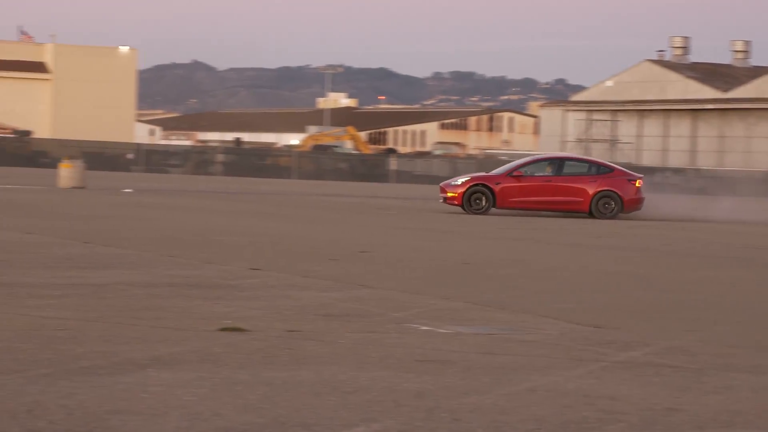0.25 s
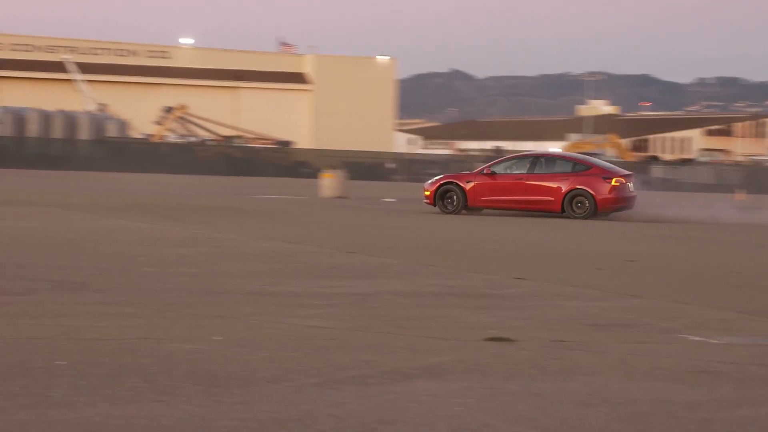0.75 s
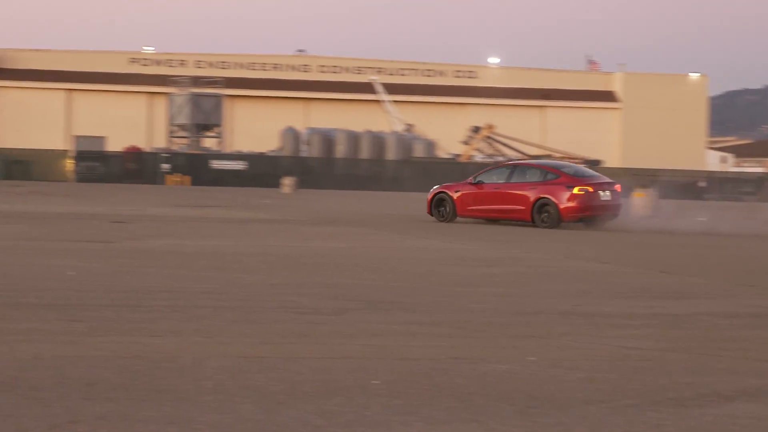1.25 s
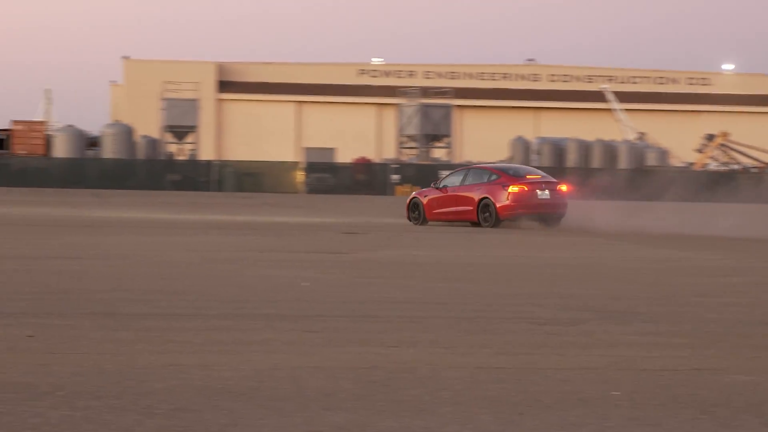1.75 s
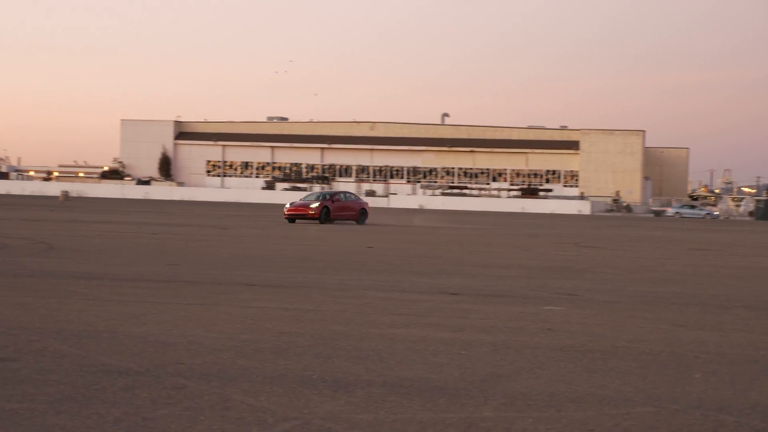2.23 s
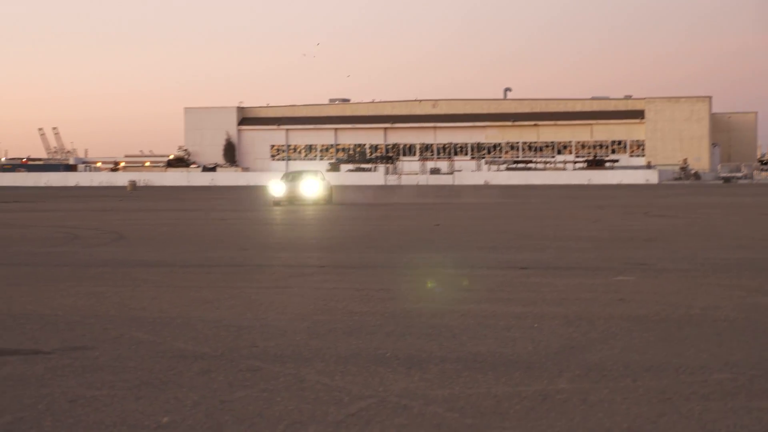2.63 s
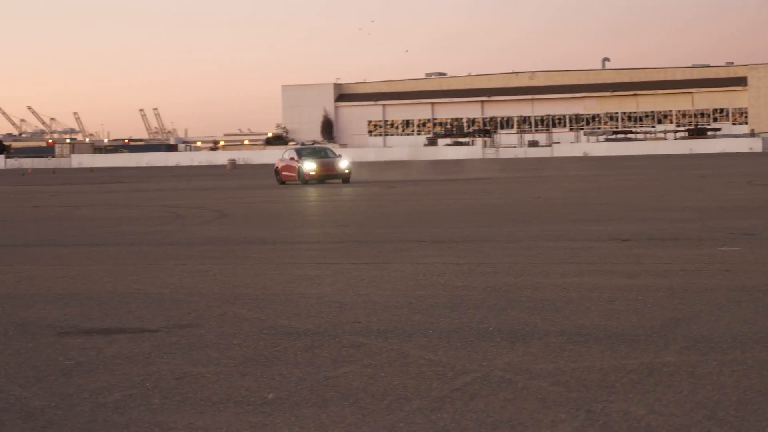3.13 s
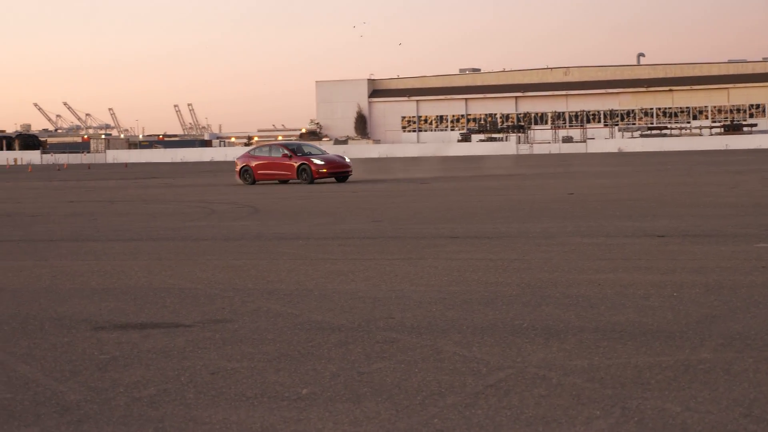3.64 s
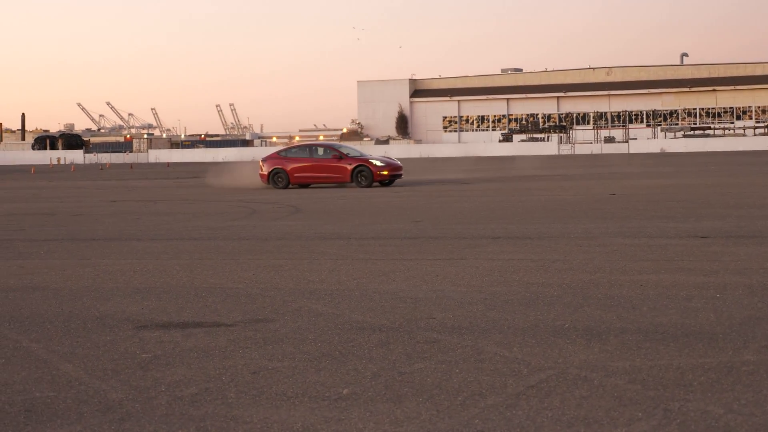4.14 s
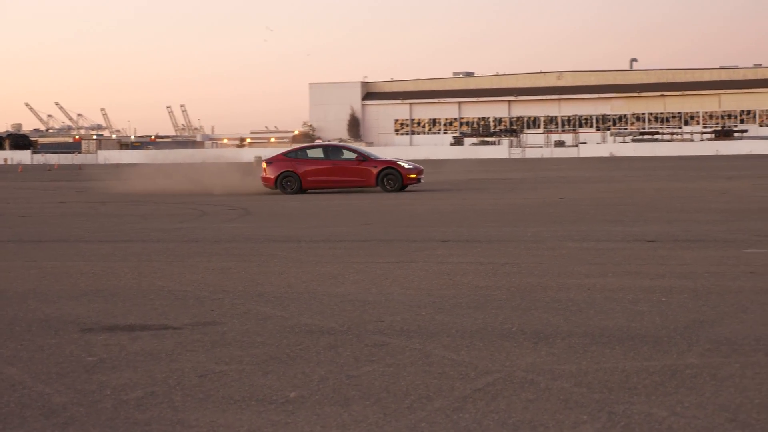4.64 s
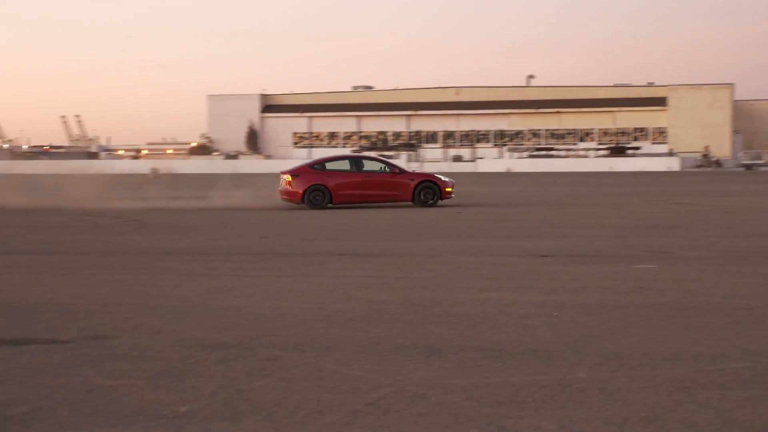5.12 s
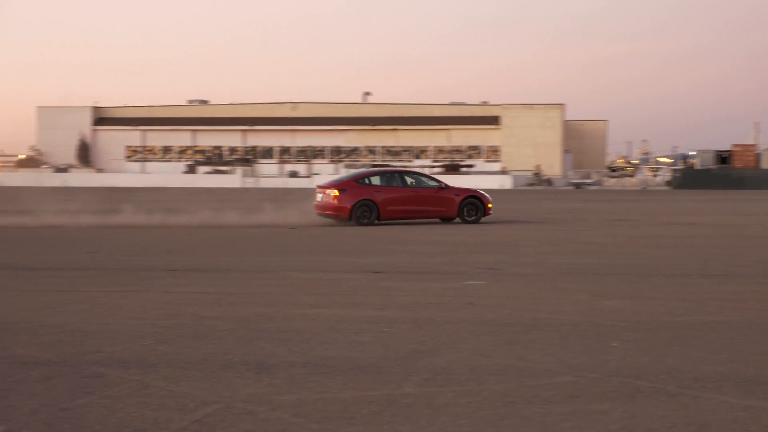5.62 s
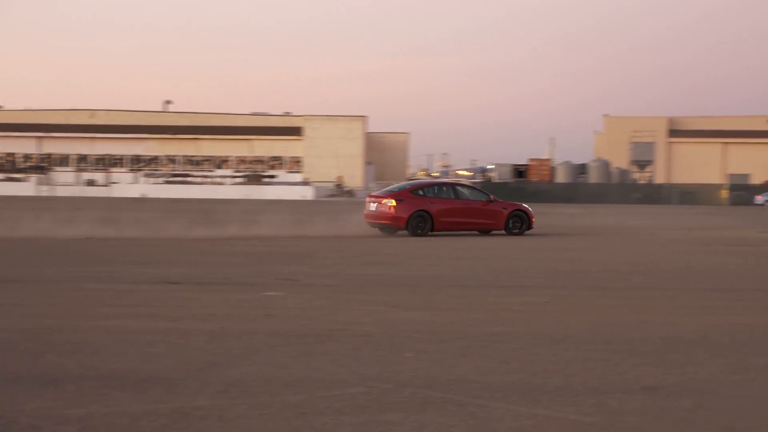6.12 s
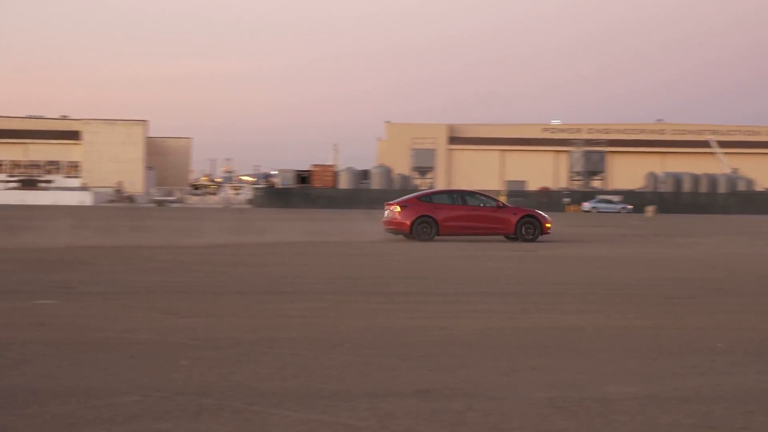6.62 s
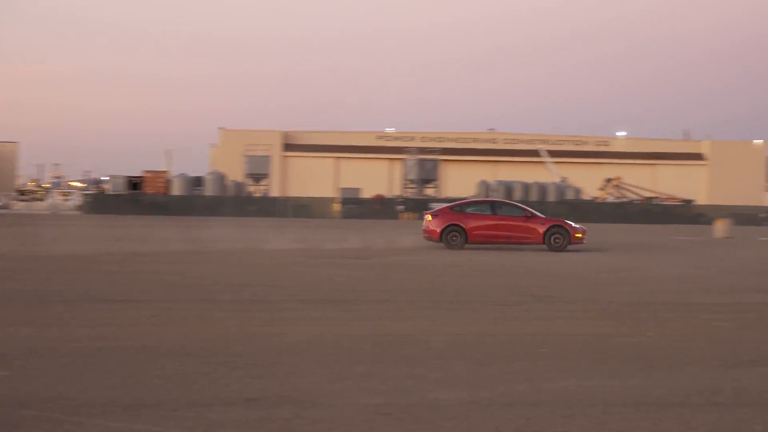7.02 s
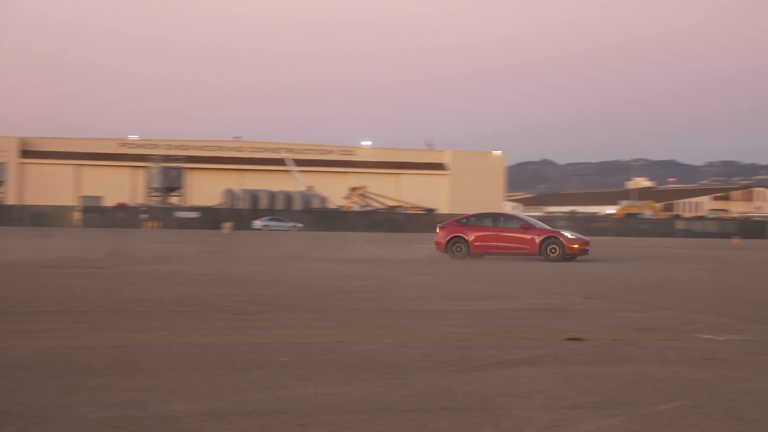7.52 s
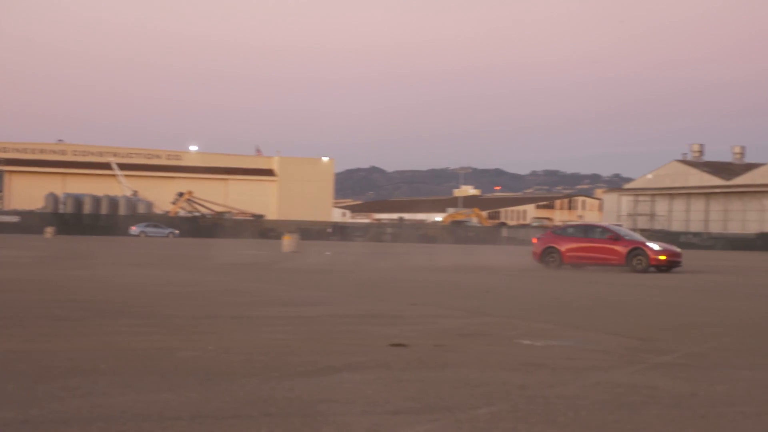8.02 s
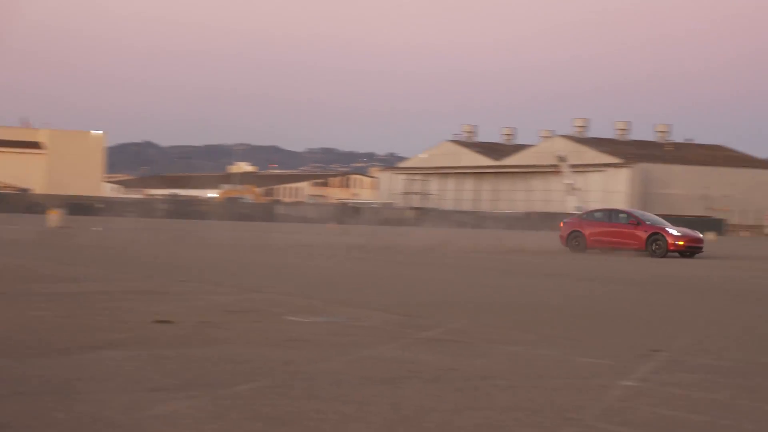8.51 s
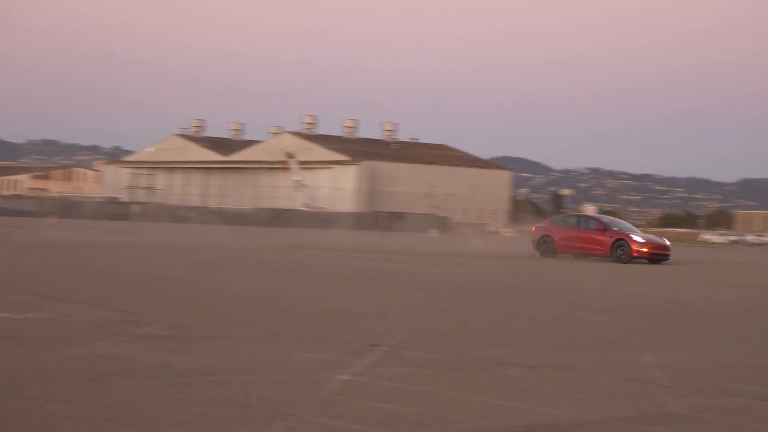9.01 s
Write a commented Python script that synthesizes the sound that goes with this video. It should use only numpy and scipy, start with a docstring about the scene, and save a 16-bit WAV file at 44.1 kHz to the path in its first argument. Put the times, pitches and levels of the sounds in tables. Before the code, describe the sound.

Outdoors, from a fixed distant microphone, sustained tyre squeal begins at once: two unsteady, beating notes, sometimes clear, sometimes fuzzy, with chattering tread and airy rasp. Short squeaks glide above and fine gravel patters over a soft low rumble. About two thirds through, the tyres grip and the squeal nearly vanishes for a moment, then bites again with stone ticks and a louder, coarser ring until the cut. Faint short reflections from hangars.

```python
"""An electric car slides in circles on the asphalt of a wide open lot, some way off, over low road and wind rumble.
From the start two tyres squeal on their own wavering pitches, as pulsed stick-slip tones blended with narrow noise.
Coloured noise makes the scrub and hiss, gliding tones the chirps, and sparse grains and ticks the grit and stones.
The squeal lapses once, around 6.4 s, as the tyres grip; it returns, and the tread then rings harder to the end.
Hangars return a faint echo of the tyre sounds: sparse, dulled, fading copies."""
import sys
import numpy as np
from scipy import signal
from scipy.fft import rfft, irfft
from scipy.io import wavfile
from scipy.ndimage import uniform_filter1d

SR = 44100
rng = np.random.default_rng(int(sys.argv[2]) if len(sys.argv) > 2 else 0)


def persist_wave(psi):
    """Save psi, clipped to +-1, as 16-bit WAV."""
    counts = np.round(np.clip(psi, -1, 1) * 32767).astype(np.int16)
    wavfile.write(sys.argv[1], SR, np.atleast_2d(counts).T)


N = 408356
TIME = np.arange(N) / SR  # seconds
EDGE_HZ = 15720  # upper band limit


def gain_of(db):
    """Decibels to amplitude."""
    return 10 ** (np.asarray(db) / 20)


def evened(x):
    """Scales to rms 1."""
    return x / np.sqrt(np.mean(x ** 2) + 1e-20)


def curves(rows):
    """Joins each column of a table by straight lines in time."""
    s, *columns = np.transpose(rows)
    return [np.interp(TIME, s, column) for column in columns]


def bell(s, half):
    """A smooth swell of height 1 around a moment, down to 37 % at half seconds either side."""
    return np.exp(-((TIME - s) / half) ** 2)


def colour(x, points):
    """Filters by a spectrum drawn on a log-frequency axis, then scales to rms 1."""
    hz, db = np.transpose(points)
    f = np.fft.rfftfreq(N, 1 / SR) + 1  # the extra 1 Hz keeps the logarithm finite
    octaves_below = np.maximum(np.log2(hz[0] / f), 0)
    octaves_above = np.maximum(np.log2(f / hz[-1]), 0)
    slope_db = 30  # per octave beyond the drawn ends
    spectrum_db = np.interp(np.log(f), np.log(hz), db) - slope_db * (octaves_below + octaves_above)
    return evened(irfft(rfft(x) * gain_of(spectrum_db), N))


def noise(points):
    """Coloured noise of rms 1."""
    return colour(rng.standard_normal(N), points)


def wander(rate_hz):
    """Smooth random curve of rms 1 that fades out steeply above a rate."""
    f = np.fft.rfftfreq(N, 1 / SR)
    spectrum = rfft(rng.standard_normal(N)) / (1 + (f / rate_hz) ** 4)
    return evened(irfft(spectrum, N))


def ring(hz, width_hz):
    """Noise in a steep resonance that follows the curve hz: two equal poles, shifted up in pitch."""
    r = np.exp(-np.pi * width_hz / SR)
    z = rng.standard_normal(N) + 1j * rng.standard_normal(N)
    z = signal.lfilter([1], [1, -2 * r, r * r], z)
    carrier = np.exp(2j * np.pi * np.cumsum(hz) / SR)
    return evened((z * carrier).real)


def steadied(x, size):
    """Evens out the slow swells of a vibration, as friction caps how far the rubber can swing."""
    return x / np.sqrt(abs(uniform_filter1d(x ** 2, size)) + 1e-6)


def rolling():
    """Lumpy low rumble and the even roar of the road, as two bands of noise."""
    # Each row: time in seconds, rumble level in dB, road roar level in dB, both before trim.
    roll = [(0.0, -50, -51), (0.05, -39.5, -48.5), (0.18, -46, -54), (0.23, -53, -51), (0.28, -47, -49),
            (0.87, -44.5, -53.5), (1.03, -53, -55.5), (1.8, -54.5, -54), (1.96, -56, -51.5),
            (2.04, -42.5, -45.5), (2.37, -53.5, -51.5), (2.5, -48, -47), (2.66, -59, -51),
            (2.89, -54.5, -48.5), (4.62, -64, -52.5), (6.22, -60.5, -49.5), (6.5, -56, -58.5),
            (6.78, -55.5, -45.5), (7.12, -55, -52), (8.41, -56, -51), (9.21, -51.5, -53.5),
            (9.26, -54, -49)]
    # Spectra of the rumble and the roar. Each row: frequency in Hz, relative level in dB per Hz.
    rumble_colour = [(24, -39), (35, -16.5), (55, -6), (80, -0.5), (120, 1.5), (170, -2.5), (260, -9),
                     (500, -34)]
    roar_colour = [(90, -27.5), (190, -0.5), (270, -0.5), (400, 1.5), (550, -1.5), (800, -6.5), (1500, -21)]
    rumble_db, roar_db = curves(roll)
    rumble = gain_of(rumble_db + 0.5 + 2.2 * wander(5)) * noise(rumble_colour)
    roar = gain_of(roar_db + 1.27) * noise(roar_colour)
    return rumble + roar


def lot(x, echo_db, t60):
    """Adds sparse, dull reflections from distant walls, their taps falling 60 dB in t60 seconds."""
    t = np.arange(SR) / SR
    taps = rng.standard_normal(SR) * (rng.random(SR) < 300 / SR)  # about 300 a second
    taps = taps * (t > .03) * gain_of(-60 * t / t60)
    taps = signal.lfilter(*signal.butter(1, 2500, fs=SR), taps)
    echo = evened(signal.fftconvolve(x, taps)[:N])
    return x + gain_of(echo_db) * echo * x.std()


def grit():
    """Many tiny grains patter on the ground and wheel arches, thicker in each spray; a few stones tick."""
    # Steady patter of grit. Each row: time in seconds, level in dB before trim.
    patter = [(0, -79.5), (3.4, -80), (4.2, -75.5), (6.15, -73.5), (6.48, -85), (6.7, -73), (7.5, -82),
              (8.8, -70.5), (9.26, -74)]
    # Sprays from loose patches. Each row: peak time in seconds, half length in seconds, peak in dB before trim.
    spray_rows = [(0.594, .18, -75), (1.201, 0.11, -75), (2.88, .06, -79), (3.12, 0.053, -69),
                  (4.002, 0.17, -63.5), (4.52, 0.043, -68), (4.713, .04, -66.5), (7.83, .04, -73),
                  (8.57, .06, -67)]
    # Stones flicked from the tread. Each row: start in seconds, peak in dB.
    stones = [(0.7814, -62), (2.1682, -72), (2.5714, -55), (3.0139, -49), (6.8758, -39), (6.8871, -43)]
    # Spectrum of the grains. Each row: frequency in Hz, relative level in dB per Hz.
    grit_colour = [(5000, -18), (6000, 2.5), (6700, 10), (7600, 3.5), (8500, -1), (9500, 2), (10500, -4),
                   (11500, -4), (12500, -15), (13700, -7.5), (15700, -8)]

    grain_db = 2.2 * np.minimum(rng.exponential(1, N), 5)
    falls = rng.random(N) < 14000 / SR  # about 14000 grains a second
    grains = rng.standard_normal(N) * gain_of(grain_db) * falls
    sprays = sum(gain_of(db) * bell(s, half) for s, half, db in spray_rows)
    level = np.hypot(gain_of(curves(patter)[0]), sprays)
    out = level * gain_of(5.0 + 1.4 * wander(12)) * colour(grains, grit_colour)

    t = np.arange(400) / SR
    for s, db in stones:
        bright_noise = np.diff(rng.standard_normal(len(t) + 2), 2)
        tick = bright_noise * np.exp(-t / .0005)
        out[round(s * SR):][:len(t)] += gain_of(db) * tick / abs(tick).max()
    return out


def scrub():
    """Rubber tearing over stone rings the tread and rasps, in shared uneven bursts."""
    # Sliding friction. Each row: time in seconds, then chatter, tread ring, rasp and hiss levels in dB before trim.
    slide = [(0.0, -40, -42, -46, -59), (0.13, -39.5, -37.5, -50, -59), (0.39, -35, -41.5, -47, -61.5),
             (0.46, -42, -37, -45.5, -56.5), (0.93, -40, -34, -48, -57.5), (1.08, -34.5, -41, -43.5, -57.5),
             (1.24, -35.5, -38.5, -49, -57), (1.29, -40, -35.5, -45, -56.5), (1.67, -41, -30, -49, -58.5),
             (1.91, -40.5, -33.5, -52, -54.5), (2.14, -42, -30.5, -45, -58),
             (2.24, -37, -34.5, -44.5, -56.5), (2.45, -39, -29, -45.5, -48),
             (3.3, -34.5, -32, -40.5, -47.5), (5.44, -37.5, -40.5, -50.5, -50.5),
             (5.98, -36.5, -37, -48, -52.5), (6.34, -41, -40.5, -57.5, -61.5), (6.47, -59, -58, -62, -70),
             (6.68, -36.5, -43, -45, -54.5), (6.86, -37, -42.5, -47.5, -54), (7.17, -37.5, -34, -42, -57),
             (7.35, -37, -37.5, -44.5, -57.5), (7.86, -36.5, -26.5, -39, -47), (8.04, -34, -28, -40.5, -52),
             (8.12, -40, -33, -39.5, -46.5), (8.25, -34.5, -27, -35.5, -48.5),
             (9.13, -41, -26, -36.5, -52.5), (9.26, -41.5, -27.5, -39, -52.5)]
    # The upper tread resonance. Each row: time in seconds, frequency in Hz.
    tread_pitch = [(0, 1411), (.4, 1338), (.65, 1466), (1.25, 1490), (1.55, 1342), (1.95, 1294),
                   (2.5, 1373), (3.05, 1267), (5.95, 1440), (6.5, 1340), (7.7, 1540), (9.26, 1290)]
    # Hiss shifting between bands as the car turns. Each row: time in seconds, share of the high band 0-1.
    sizzle = [(0, 0.5), (2.4, .42), (3.5, .27), (3.95, 0.5), (4.6, 0.22), (6.8, 0.4), (8.2, 0.02),
              (8.7, .35), (9.26, 0.06)]
    # Scuffs as the tread drags over coarser asphalt.
    # Each row: peak time in seconds, half length in seconds, lift of the scrub in dB.
    scuffs = [(2.562, .04, 3.5), (2.877, .07, 4.5), (3.895, 0.11, 2), (6.73, .08, 0)]
    # Spectra of each friction layer. Each row: frequency in Hz, relative level in dB per Hz.
    tread_colour = [(700, -15), (1050, -2.5), (1330, 2), (1560, -1), (1760, -2.5), (1950, 0.5),
                    (2200, -2.5), (2400, -2), (3500, -8.5)]
    chatter_colour = [(480, -28), (570, -13), (650, -4), (850, 5), (1050, 2.5), (1250, -2), (1550, -7),
                      (1800, -27.5), (2500, -38.5)]
    rasp_colour = [(1200, -24.5), (1600, -12), (1750, 1.5), (1950, 0), (2200, -1), (2600, -6), (3100, -14),
                   (4000, -28.5)]
    low_hiss_colour = [(2400, -8), (3000, -1.5), (3450, 0.5), (3900, -2.5), (4300, -9.5), (5000, -24)]
    high_hiss_colour = [(3600, -18.5), (4200, 2), (4600, 2.5), (5300, -2.5), (5900, -15), (6700, -13.5),
                        (7600, -22.5), (9000, -30)]

    chatter_db, ring_db, rasp_db, hiss_db = curves(slide)
    hz = curves(tread_pitch)[0]
    tread = gain_of(ring_db - 5.0) * colour(ring(hz, width_hz=450), tread_colour)
    # single ribs catch for a moment and sing around the tread resonance
    rib_rings = sum(ring(hz * (side + .03 * wander(9)), width_hz=26) for side in (.95, 1.04))
    ribs = gain_of(ring_db - 10.5) * rib_rings
    rib_mode_hz = 2130 * (1 + 0.051 * wander(16))
    rib_mode = gain_of(rasp_db - 10) * ring(rib_mode_hz, width_hz=45)

    chatter = gain_of(chatter_db + 3.0) * noise(chatter_colour)
    rasp = gain_of(rasp_db - 2.0) * noise(rasp_colour)
    high = np.clip(curves(sizzle)[0], 0, 1)
    hiss_mix = np.sqrt(1 - high) * noise(low_hiss_colour) + np.sqrt(high) * noise(high_hiss_colour)
    hiss = gain_of(hiss_db - 1.07) * hiss_mix
    air = gain_of(1.2 * wander(5.3))  # moving air makes rasp and hiss come and go

    scuff_db = sum(db * bell(s, half) for s, half, db in scuffs)
    bursts = gain_of(scuff_db + 1.1 * wander(40))
    return (tread + ribs + rib_mode + chatter + air * (rasp + hiss)) * bursts


def chirps():
    """Brief gliding squeaks above the main notes, as a tread edge catches."""
    # Each row: start in seconds, length in seconds, start pitch in Hz, end pitch in Hz, level in dB (rms at mid-chirp).
    chirp_rows = [(0.216, 0.16, 942, 1035, -35), (1.027, 0.4, 1025, 1058, -39.5),
                  (1.112, .13, 1967, 1570, -37), (1.201, 0.17, 1500, 1410, -36),
                  (1.317, .25, 1634, 1530, -39), (3.858, 0.074, 2193, 2120, -36.5),
                  (4.025, 0.12, 2037, 1984, -39.5), (6.029, .16, 1570, 1390, -40),
                  (6.241, .08, 1370, 1446, -40.5), (7.068, 0.064, 1066, 1005, -29.5),
                  (7.964, 0.11, 1070, 940, -30.5), (8.679, 0.37, 1240, 1190, -29)]
    out = np.zeros(N)
    jostle = 1 + .025 * wander(110)  # shared pitch roughness
    for s, length, start_hz, end_hz, db in chirp_rows:
        u = np.clip((TIME - s) / length, 0, 1)  # progress through the chirp
        glide_hz = start_hz + u * (end_hz - start_hz)
        turns = np.cumsum(glide_hz * jostle) / SR
        out += gain_of(db) * np.sqrt(2) * np.sin(np.pi * u) * np.cos(2 * np.pi * turns)
    return out


def tyre(rows, level_db, overtone_db, waver, jitter, flutter_db, fuzz_hz):
    """Tread blocks stick and slip in step for a clear note, out of step for a fuzzy one."""
    # How unevenly the tread lets go. Each row: time in seconds, roughness 0-1.
    roughness = [(0, 0.25), (1.5, 0.08), (1.9, 0.6), (2.7, 0.2), (2.9, .6), (3.8, 0.44), (5.3, .45),
                 (5.9, .05), (6.3, 0.3), (6.65, 0.7), (6.95, .95), (7.15, 0), (9.26, 0.6)]
    # Overtones of the stick-slip cycle. Each row: multiple of the pitch, relative level in dB before colouring.
    overtone_rows = [(2, 4), (3, -6), (4, -24.5), (5, -20.5)]
    # Spectrum the carcass gives the overtones. Each row: frequency in Hz, relative gain in dB.
    carcass = [(1100, -3.5), (1330, -3), (1560, 1), (1780, -3.5), (2000, 2), (2170, 0), (2350, -9.5),
               (2700, -8), (3400, 2), (4500, -12)]

    hz, db, bright_db = curves(rows)
    rough = np.clip(curves(roughness)[0], 0, 1)
    load = wander(7)  # the load on the tyre keeps shifting: pitch and level rise together
    hz = hz * (1 + waver * load + .008 * wander(16.28))
    db = db + 2.27 * load
    # the grain of the asphalt jostles each cycle
    turns = np.cumsum(hz * (1 + jitter * wander(130.0))) / SR

    clear = evened(np.cos(2 * np.pi * turns))
    fuzzy = ring(hz, fuzz_hz)
    note = np.sqrt(1 - rough) * clear + np.sqrt(rough) * fuzzy
    flutter = ring(np.full(N, 32.), width_hz=79)  # the spinning tyre judders
    note = evened(steadied(note, size=1800) * gain_of(flutter_db * flutter))

    # a neighbouring rib slips a little out of tune
    stray = turns + np.cumsum(hz * .034 * wander(12)) / SR
    overtones = np.zeros(N)
    for k, partial_db in overtone_rows:
        pair = np.cos(2 * np.pi * k * turns) + .8 * np.cos(2 * np.pi * k * stray)
        overtones += gain_of(partial_db + 3.2 * wander(55)) * pair
    body = gain_of(bright_db + overtone_db) * colour(overtones, carcass)
    return gain_of(db + level_db) * note + body


def scene():
    """The sliding tyres echo in the open lot; grit and rolling noise join them without echo."""
    # The lower- and the higher-pitched tyre, before waver and trim.
    # Each row: time in seconds, stick-slip pitch in Hz, note level in dB, overtone level in dB.
    low_rows = [(0, 745, -21.5, -47), (.15, 727, -31, -47.5), (.6, 708, -31, -42.5), (.86, 735, -26, -43),
                (1.1, 712, -28.5, -46.5), (1.27, 735, -22.5, -34.5), (1.42, 703, -28, -44),
                (1.62, 713, -30.5, -42), (1.88, 640, -31.5, -46), (2.2, 745, -39.5, -56),
                (2.6, 758, -30.5, -55.5), (2.8, 700, -36.5, -42), (3.05, 655, -31, -35),
                (3.43, 688, -27, -33.5), (3.58, 672, -30.5, -30), (3.85, 708, -28, -38.5),
                (4.07, 695, -29.5, -34), (4.17, 755, -24.5, -43.5), (4.48, 720, -27.5, -42),
                (4.67, 762, -26, -42.5), (5.25, 725, -33, -47.5), (5.55, 773, -24, -44),
                (6.02, 776, -25.5, -36), (6.2, 678, -31, -46), (6.33, 705, -35.5, -46.5),
                (6.5, 750, -46.5, -72), (6.8, 790, -43.5, -58.5), (7.15, 755, -26.5, -37),
                (7.38, 778, -31.5, -49), (7.55, 730, -33.5, -53), (8.2, 767, -26.5, -41.5),
                (8.45, 730, -34.5, -43), (8.68, 740, -28.5, -42.5), (8.96, 625, -36.5, -32.5),
                (9.26, 642, -39.5, -35)]
    high_rows = [(0, 796, -35, -57.5), (.35, 839, -28.5, -60.5), (.58, 785, -33.5, -53.5),
                 (1.02, 856, -31, -49), (1.27, 772, -37, -55), (1.4, 790, -34.5, -51.5),
                 (1.85, 764.4, -31, -41), (1.98, 776.5, -33.5, -54), (2.07, 874, -27.5, -49.5),
                 (2.27, 912.4, -22, -44), (2.45, 812, -31.5, -48.5), (2.57, 855, -23, -50.5),
                 (2.7, 795, -21.5, -47), (2.82, 769.4, -36.5, -54), (3.4, 742, -30, -50.5),
                 (3.6, 809.8, -30.5, -56), (4.15, 800, -26.5, -52.5), (4.55, 790, -26.5, -49),
                 (4.92, 829.4, -24, -53.5), (5.17, 788, -26.5, -38), (5.35, 819.2, -26.5, -50),
                 (5.95, 818, -33, -43.5), (6.3, 780, -47.5, -67), (6.55, 811.5, -48, -71),
                 (6.72, 911, -31, -49), (6.92, 855, -36.5, -46.5), (7.05, 818.3, -27, -49),
                 (7.33, 887, -29, -40), (7.6, 813.6, -31.5, -39.5), (7.9, 827.4, -30, -32.5),
                 (8.13, 875.4, -31, -42), (8.42, 808, -36, -40), (8.68, 847, -29, -34),
                 (9.0, 756, -30, -43.5), (9.26, 715, -35, -54.5)]
    low = tyre(low_rows, level_db=-0.98, overtone_db=.3, waver=.01, jitter=0.01416,
               flutter_db=1.45, fuzz_hz=94.5)
    high = tyre(high_rows, level_db=-1.25, overtone_db=-0.7, waver=.013, jitter=0.01508,
                flutter_db=2.0, fuzz_hz=113)
    sliding = lot(low + high + chirps() + scrub(), echo_db=-13, t60=0.56)
    return (sliding + grit() + rolling())[None]


def record(dry):
    """Softens the two ends and removes what lies above the band limit."""
    dry = dry * signal.windows.tukey(N, .001)
    low_pass = signal.firwin(511, EDGE_HZ, window=("kaiser", 9), fs=SR)
    return signal.oaconvolve(dry, low_pass[None], "same")


dry = scene()
out = record(dry)
persist_wave(out)
```